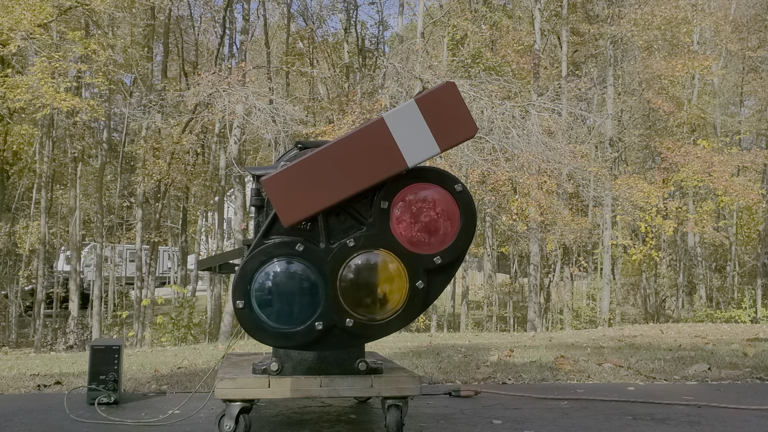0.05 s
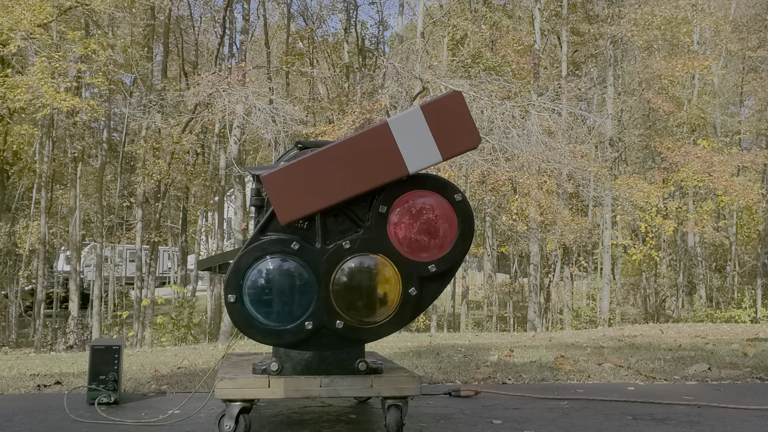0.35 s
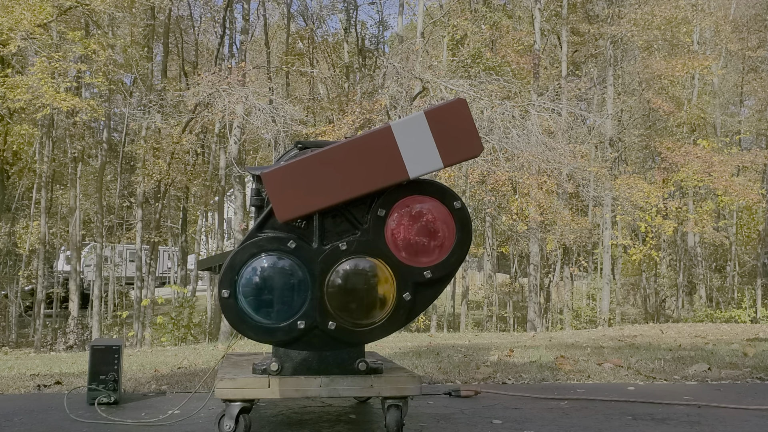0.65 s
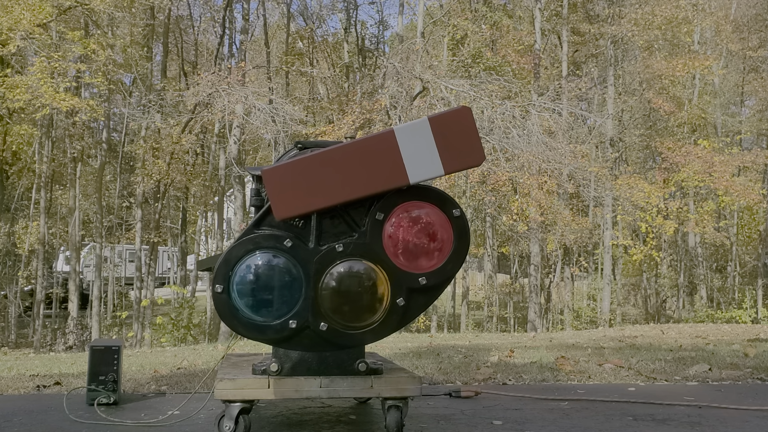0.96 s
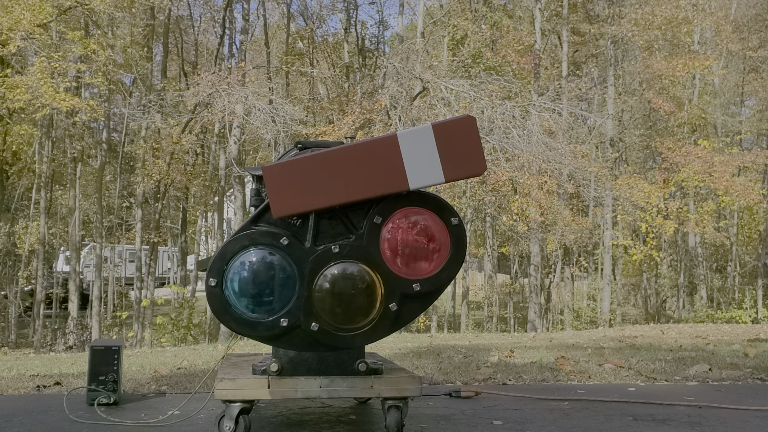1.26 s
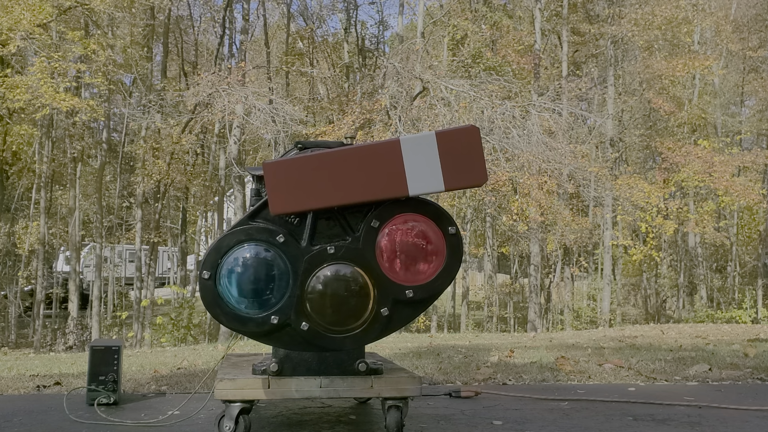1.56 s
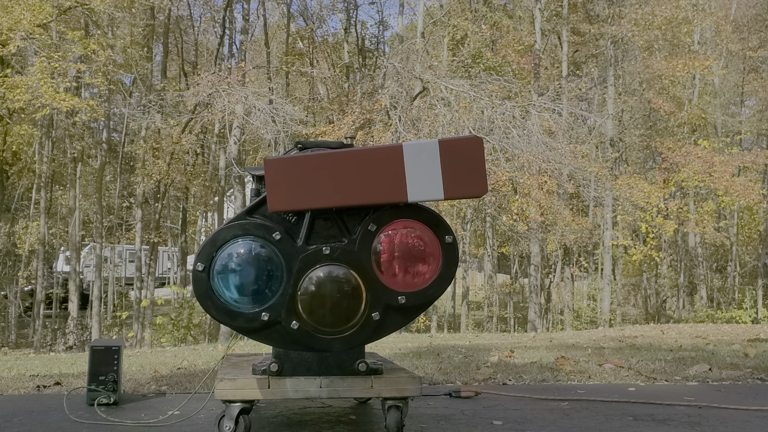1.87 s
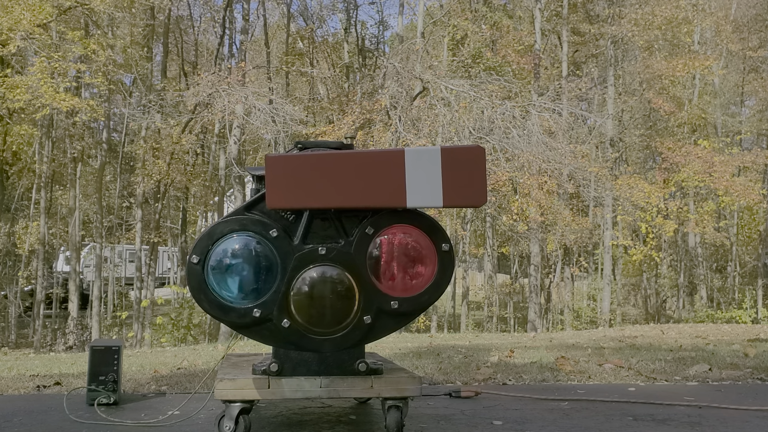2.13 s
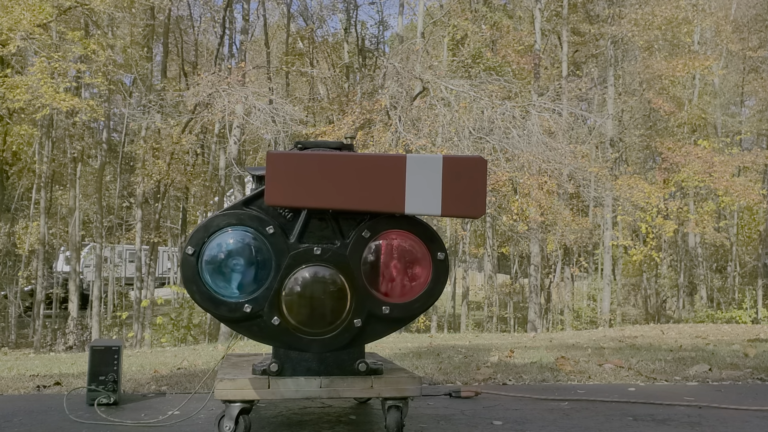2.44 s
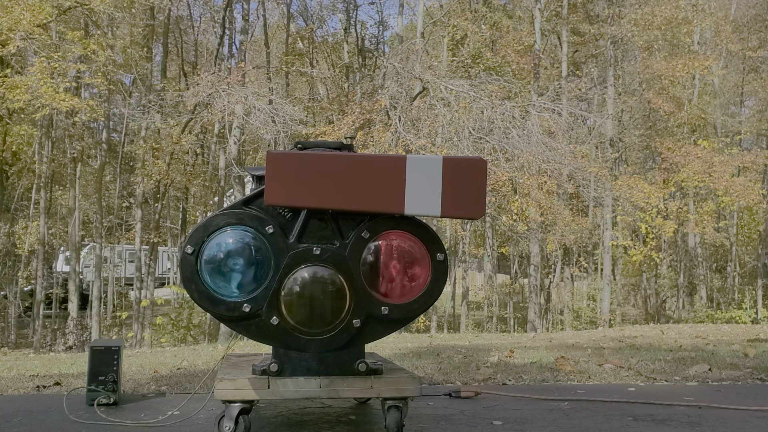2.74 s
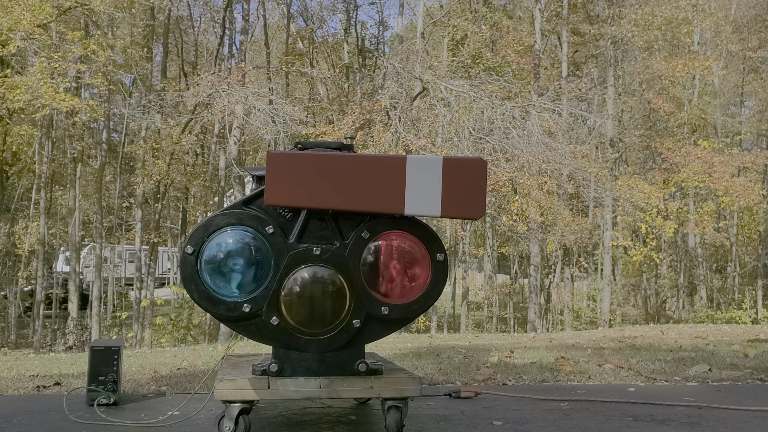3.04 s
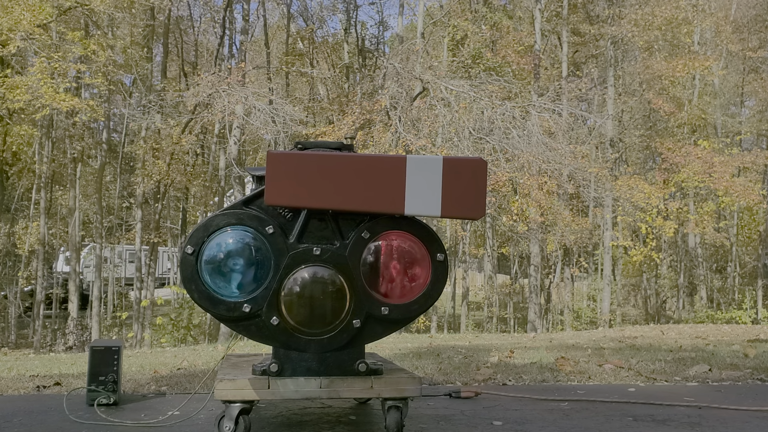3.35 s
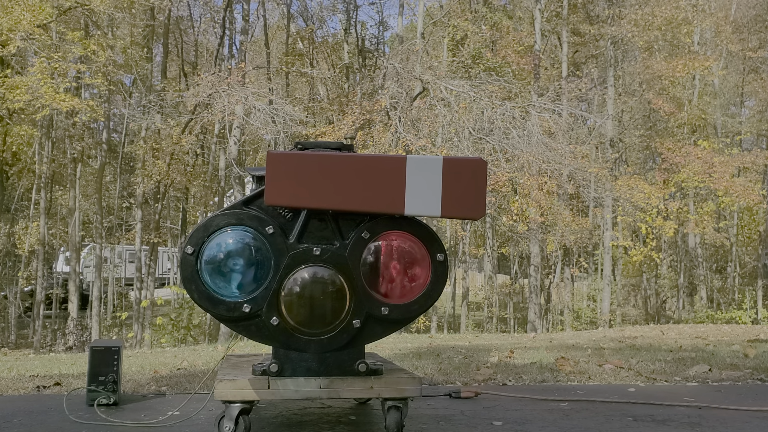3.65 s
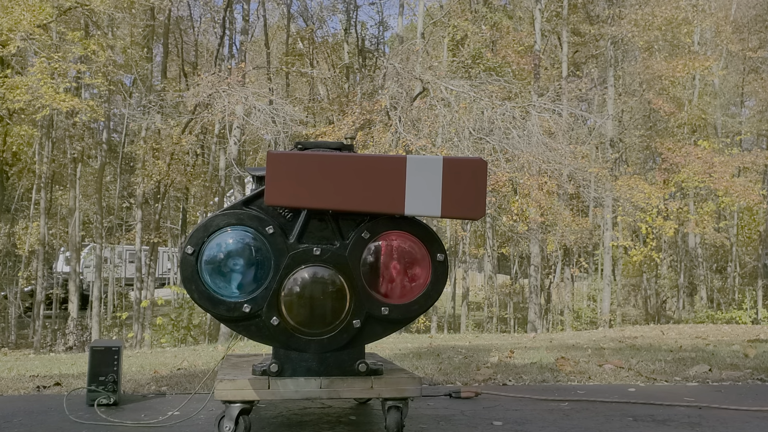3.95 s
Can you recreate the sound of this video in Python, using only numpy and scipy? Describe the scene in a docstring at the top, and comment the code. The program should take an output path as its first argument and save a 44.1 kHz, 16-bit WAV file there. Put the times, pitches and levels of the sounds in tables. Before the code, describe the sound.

A railway signal lowers its arm with rumbling gears, thin steel squeals and sharp clacks, leaving quiet open air and faint birds.

```python
"""Semaphore signal lowering beside a wood

A railway signal lets its arm down: the gear train rumbles in its iron housing, dry steel scrapes and
squeals, sprung contacts snap over one by one, and the arm creeps to rest in small lurches.
A low hum comes and goes. Open air, faint birds, twig snaps and a few soft thuds remain."""
import sys
import numpy as np
from scipy import signal
from scipy.fft import rfft, irfft
from scipy.io import wavfile
from scipy.ndimage import uniform_filter1d

SR = 44100
rng = np.random.default_rng(int(sys.argv[2]) if len(sys.argv) > 2 else 0)


def waveform_to_disk(signal):
    """Save audio, clipped to [-1, 1], as 16-bit WAV at the path in sys.argv[1]."""
    frames = np.transpose(np.atleast_2d(signal))
    scaled = np.clip(frames, -1, 1) * 32767
    samples = np.round(scaled).astype(np.int16)
    wavfile.write(sys.argv[1], SR, samples)


N = 374850

# tone curves of the open air and the microphone hiss: f/Hz, level/dB
AIR_EQ = [(12, -39), (22, -15), (70, 2.5), (190, -9), (388, -12), (1330, -22), (3160, -31), (4300, -32.5),
          (5530, -41), (7950, -31), (8650, -49), (16000, -40)]
HISS_EQ = [(20, -34.5), (5500, -61), (7000, 1.5), (8150, 10), (8500, -30), (16000, -33.5)]
# stereo width of the air and the mechanism: f/Hz, left-right likeness
AIR_LIKENESS = [(60, 0.88), (130, 1), (290, 0.18), (640, -0.44), (1400, -0.74), (3100, -0.11),
                (15000, -0.046)]
SIGNAL_LIKENESS = [(290, 1), (640, 0.67), (1400, 0.49), (4000, 0.31), (15000, 0.29)]
# their lean to the left: f/Hz, left minus right/dB
AIR_PAN = [(200, -0.5), (400, 2), (1300, 0), (4400, 0.5), (8000, 7), (15000, 2.5)]
SIGNAL_PAN = [(380, -.5), (700, 1.5), (1300, 2.5), (2400, 1.5), (4400, 4.5), (15000, 4)]
# effort of the gear train, easing as the arm comes level: t/s, level/dB
EFFORT = [(0, 2), (0.418, -0.5), (0.749, -4), (1.35, -0.5), (2.25, -1), (2.75, -3), (3.25, -7), (3.9, -9.5),
          (4.1, -14.5), (4.351, -14), (4.88, -23), (5.08, -32.5)]
# lurches of the slowing arm that swell the boom: t/s, gain/dB
LURCHES = [(3.578, 6.5), (3.82, 3.5), (3.97, 7), (4.22, 10), (4.419, 7), (4.87, 5)]
# resonances of the housing, panels, thin covers and wheels: f/Hz, width/Hz, level/dB
HOUSING_MODES = [(172.9, 16.2, 0), (189.4, 13, -6), (208.96, 9.6, -0.5)]
PANEL_MODES = [(268, 10.6, 0), (294.4, 12.8, -0.5), (332.1, 13.1, 0.5), (398.3, 32.4, 0), (422, 28.7, 0),
               (458.7, 29, -6), (510, 23.5, -7.5), (564, 11, -7.5), (623, 21, -8), (645, 10.8, 0.5),
               (661, 72, -11.5), (753.4, 21, -3.5), (790.7, 9.4, -4), (849.3, 30.5, -12), (1018, 83, -22),
               (1275, 44, -20.5), (1400, 54, -21.5)]
COVER_MODES = [(839, 33, 11), (1006, 56, -6), (1180, 26, -5), (1490, 30, -6)]
WHEEL_MODES = [(2300, 34, -10.5), (2548, 70, -1), (2823, 24, -3.5)]
# tone curve of the grinding teeth: f/Hz, level/dB
GRIND_EQ = [(100, -22), (250, 13), (850, -8), (1100, -8.5), (1500, -7), (2000, -19), (3200, -22.5),
            (16000, -60.5)]
# fader moves of the fast gears' whirr: t/s, level/dB
WHIRR_FADER = [(0, -55), (1.0, -59), (1.18, -46), (2.25, -46), (2.47, -58), (2.62, -45), (2.9, -48),
               (4, -75)]
# thin tones of scraping steel: f/Hz, level/dB
SCRAPE_TONES = [(5750, -7), (5985, 0), (6150, -5), (6300, -10)]
# moments where the steel binds: t/s, level/dB
BINDS = [(0.194, -57), (0.334, -69), (0.382, -63), (0.42, -66), (0.62, -66), (1.201, -68), (1.351, -66),
         (1.722, -66), (1.8, -69), (1.934, -60), (2.284, -68.5), (2.433, -59.5), (2.587, -69), (2.744, -72),
         (2.809, -69.5), (2.98, -68), (3.234, -63), (3.309, -65.5), (3.649, -56.5), (4.162, -69),
         (4.619, -70)]
# stretches where the wheels run dry: t/s, length/s, low squeal/dB, high squeal/dB
DRY_RUBS = [(0.042, 0.24, -65.5, -63), (0.274, 0.18, -62, -66.5), (0.491, 0.089, -65, -74),
            (0.76, 0.22, -72, -77), (1.13, 0.11, -61.5, -69), (1.294, 0.11, -59, -65.5),
            (1.432, 0.21, -62, -72), (1.689, 0.079, -66, -68), (1.771, 0.074, -68.5, -66),
            (1.89, 0.084, -63.5, -71), (1.972, 0.055, -64.5, -63), (2.174, 0.077, -63.5, -61.5)]
# low and high squeal: f/Hz, width/Hz, extra length/s
SQUEALS = [(2875, 85, .08), (3945, 80, .015)]
# hiss of dry steel: f/Hz, width/Hz, level/dB
RASP_BANDS = [(3550, 130, 0), (4360, 30, -2), (5740, 1700, -13.5)]
# backlash knocks: t/s, relative boom/dB, relative rattle/dB
KNOCKS = [(0.097, -47, -34.5), (0.374, -20, -33.5), (0.416, -22.5, -35), (1.06, -28.5, -37.5),
          (1.238, -22, -37), (1.361, -21, -32.5), (1.773, -33, -33.5), (1.963, -35, -33.5),
          (2.57, -24.5, -35), (2.994, -24.5, -52), (3.747, -27.5, -50), (4.78, -36, -63)]
# tone curve of loose panels: f/Hz, level/dB
RATTLE_EQ = [(120, -18), (330, 6.5), (850, 0), (1450, -15.5), (1800, -28.5), (8000, -66)]
# contacts snapping and cams knocking: t/s, level/dB, body/dB, treble/dB, frame/dB, spring/dB, t60/s
CLACKS = [(0.499, -44, -2, -37, -19, -33, 0.1), (2.298, -38.5, 12.5, -30, -6.5, -31, 0.065),
          (2.6895, -39, 13.5, -21, -22, -42.5, 0.16), (2.729, -42, 4.5, -19.5, -19, -35, 0.11),
          (3.304, -57.5, 10, -21, -1, -34, 0.15), (3.072, -30, -3.5, 4, -6.5, -2, 0.11),
          (3.45, -32, -2.5, 3.5, -3.5, 0, 0.13), (3.916, -29.5, 3, 3, 0.5, -33, 0.12),
          (4.552, -33, 2.5, -4.5, 1, -28, 0.14)]
# tone curve of a clack: f/Hz, level/dB
CLACK_EQ = [(150, -5), (500, 1.5), (850, 6), (1400, -1), (2400, 0), (4500, -8), (7000, -9), (9000, -16),
            (9800, -25.5), (11000, -17.5), (16000, -21)]
# ring of the contact frame and the leaf spring: f/Hz, level/dB, t60/s
FRAME_MODES = [(791, -19, .45), (834, -14, .2), (1010, -12, .12), (1190, -10, .16), (1270, -20, .33),
               (1297, -19, .36), (1440, -8, .15), (1810, -10, .14), (1950, -6, .14), (3120, -11, .17),
               (3320, -14, .16), (4900, -13, .11)]
SPRING_MODES = [(5440, -17, .3), (5420, -8, .1), (5490, -12, .07), (8520, -17, .08)]
# swells of the hum: t/s, length/s, rise/s, level/dB
HUMS = [(0.892, 3.17, 2.1, -48.5), (5.454, 1.34, 0.57, -54.5)]
# bird trills: t/s, length/s, top of the arch f/Hz, relative level/dB
TRILLS = [(2.786, 0.33, 3950, -70), (6.564, 0.312, 3920, -69.5)]
# far bird whistles: t/s, length/s, f/Hz, level/dB, rasp/0-1
WHISTLES = [(5.201, 0.05, 4530, -69, 0.05), (5.457, 0.12, 3200, -77.5, 0.5), (6.19, 0.25, 4090, -80, 0.1),
            (6.224, 0.1, 3200, -77, 0.7), (7.144, 0.11, 3230, -77.5, 0.6), (7.677, 0.12, 3280, -76.5, 0.7)]
# twigs and dry leaves: t/s, level/dB, centre f/Hz
TWIGS = [(5.861, -60, 2960), (6.211, -54, 2620), (6.648, -55, 1400), (6.754, -53, 1990), (6.816, -55, 5900),
         (6.908, -53.5, 2700), (7.33, -48, 900), (8.07, -48.5, 4030), (8.088, -44, 3550)]
# soft thuds on the ground: t/s, level/dB, f/Hz
THUDS = [(6.645, -50, 435), (7.331, -41, 496), (7.332, -40.5, 186), (7.417, -48.5, 603),
         (7.945, -43.5, 397)]

TIME = np.arange(N) / SR


def gain_of(db):
    """Decibels to amplitude."""
    return 10 ** (np.asarray(db) / 20)


def unit_rms(x):
    """Scales to rms 1."""
    return x / np.sqrt(np.mean(x ** 2) + 1e-20)


def curve_at(points, hz):
    """Reads a curve on a log-frequency axis."""
    f, value = np.transpose(points)
    return np.interp(np.log(hz + 1), np.log(f + 1), value)


def add(mix, s, sound):
    """Mixes a sound in at time s."""
    part = mix[..., max(round(s * SR), 0):][..., :sound.shape[-1]]
    part += sound[..., :part.shape[-1]]


def bins(x):
    """Frequencies of the spectrum of x."""
    return np.fft.rfftfreq(x.shape[-1], 1 / SR)


def noise(size=N):
    """Two unrelated channels of white noise."""
    return rng.standard_normal((2, size))


def filtered(x, response):
    """Weights each frequency of x."""
    return irfft(rfft(x) * response, x.shape[-1])


def coloured(x, eq):
    """Shapes x with a tone curve (f/Hz, level/dB), at rms 1."""
    return unit_rms(filtered(x, gain_of(curve_at(eq, bins(x)))))


def resonant(x, modes):
    """Plays x through resonances (f/Hz, width/Hz, level/dB) of alternating polarity, at rms 1."""
    f, response = bins(x), 0
    for k, (hz, width, db) in enumerate(modes):
        detune = (f - hz) / width
        response += (-1) ** k * gain_of(db) / ((1 + 2j * detune) * (1 + 0.5j * detune))
    return unit_rms(filtered(x, response))


def wander(hz, size=N):
    """Smooth random modulation up to about hz, at rms 1."""
    coarse = rng.standard_normal(size // 16 + 1)
    slow = filtered(coarse, 1 / (1 + (bins(coarse) / 16 / hz) ** 4))
    return unit_rms(np.interp(np.linspace(0, len(slow) - 1, size), np.arange(len(slow)), slow))


def held(start, length, attack, release):
    """Envelope that rises, holds and is gone after its length."""
    t = TIME - start
    return np.clip(np.minimum(t / attack, (length - t) / release), 0, 1)


def swell(s, half_width_s):
    """A bell-shaped swell around time s."""
    return np.exp(-((TIME - s) / half_width_s) ** 2)


def ring(modes, t):
    """Dying modes, with their own phases in each channel."""
    return sum(gain_of(db - 60 * t / t60) * np.sin(2 * np.pi * (hz * t + rng.random((2, 1))))
               for hz, db, t60 in modes)


def stereo(pair, likeness, pan, left_lead_s=0):
    """Blends two versions of a sound into a stereo image; the first feeds both sides."""
    left, other = rfft(pair)
    f = bins(pair)
    shared = np.clip(curve_at(likeness, f), -1, 1)
    lean = gain_of(curve_at(pan, f) / 2)
    right = (shared * left + np.sqrt(1 - shared ** 2) * other) * np.exp(-2j * np.pi * f * left_lead_s)
    return irfft(np.array([left * lean, right / lean]), N)


def air():
    """The bed: breeze and microphone hiss, with distant rumble and leaves that each swell once."""
    breeze = coloured(noise(), AIR_EQ) * gain_of(-57 + 0.17 * wander(5))
    rumble = resonant(noise(), [(63.5, 33, 12), (97, 25, -1.5)])
    rumble *= gain_of(-68 + 15.3 * swell(7.38, 0.07))
    stirring = noise() * gain_of(7.1 * np.tanh(wander(30)))
    leaves = coloured(stirring, [(300, -26), (2200, 2), (5000, 7.5), (15000, -20)])
    leaves *= gain_of(-84 + 8.5 * swell(7.6, 0.58))
    hiss = gain_of(-83) * coloured(noise(), HISS_EQ)
    return stereo(breeze + rumble + leaves + hiss, AIR_LIKENESS, AIR_PAN)


def effort_db():
    """Effort of the gear train at every sample."""
    return np.interp(TIME, *np.transpose(EFFORT))


def teeth(per_s, slide, uneven_db):
    """Small tooth impacts over sliding friction, in uneven surges."""
    impacts = noise() * (rng.random(N) < per_s / SR)
    return (unit_rms(impacts) + slide * noise()) * gain_of(uneven_db * wander(8.5))


def gears():
    """Meshing teeth make the housing boom and its panels grind; the arm's weight steadies the load."""
    drive = teeth(per_s=700, slide=1.2, uneven_db=1.5)
    boom = resonant(drive, HOUSING_MODES)
    boom = unit_rms(boom / np.sqrt(uniform_filter1d(boom ** 2, 4000) + 0.19))  # gentle compression
    panels = resonant(drive, PANEL_MODES) + gain_of(-13.5) * coloured(drive, GRIND_EQ)
    panels /= np.sqrt(uniform_filter1d(unit_rms(panels) ** 2, 3000) * 0.33 + 0.49)
    dull = coloured(panels, [(350, 0), (415, 6.5), (500, 1), (1500, -0.5)])  # slow teeth land softly
    slowing = np.interp(TIME, [3, 4.1], [0, 1])
    grind = (1 - slowing) * panels + slowing * dull
    lurch_db = sum(db * swell(s, 0.04) for s, db in LURCHES)
    boom_db, grind_db = -35 + 0.68 * effort_db() + lurch_db, -37 + effort_db()
    running = np.interp(TIME, [4.98, 5.12], [1, 0])
    return running * (gain_of(boom_db) * boom + gain_of(grind_db) * grind)


def whirr():
    """The fast gears rattle in their thin covers, swelling and falling away."""
    level_db = np.interp(TIME, *np.transpose(WHIRR_FADER), right=-np.inf)
    rattling = teeth(per_s=150, slide=0.45, uneven_db=2.5)
    rattling /= np.sqrt(uniform_filter1d(rattling ** 2, 5000))  # levels out the surges
    return gain_of(level_db) * resonant(rattling, COVER_MODES)


def wheels():
    """Dry rubbing murmurs in the wheels; now one mode takes hold and now another."""
    rubbing = teeth(per_s=400, slide=1, uneven_db=1.2)
    holds = [gain_of(2 * wander(7)) for _ in WHEEL_MODES]
    song = sum(hold * gain_of(db) * resonant(rubbing, [(hz, width, 0)])
               for hold, (hz, width, db) in zip(holds, WHEEL_MODES))
    return gain_of(-63.5 + 1.96 * effort_db()) * unit_rms(song)


def scrapes(until_s=3.8, edge_s=0.013):
    """Steel on steel: thin, wavering tones over grit, flaring briefly wherever it binds."""
    level = gain_of(-77) * held(0, until_s, edge_s, edge_s)
    level += sum(gain_of(db) * swell(s, edge_s) for s, db in BINDS)
    tones = np.zeros(N)
    for centre_hz, db in SCRAPE_TONES:
        flicker = gain_of(db + 4 * wander(25))
        hz = centre_hz + 60 * wander(30) + 130 * wander(600)
        tones += flicker * np.sin(2 * np.pi * np.cumsum(hz) / SR)
    wide_tones = unit_rms(np.array([tones, tones[::-1]]))
    grit = resonant(teeth(per_s=600, slide=1, uneven_db=3), [(5400, 900, 0)])
    return level * unit_rms(wide_tones + 0.5 * grit)


def squeals(drift=0.01):
    """Each dry stretch of the wheels sings two squeals, at slightly new pitches, over a rasp."""
    out = np.zeros((2, N))
    for start, length, low_db, high_db in DRY_RUBS:
        for db, (hz, width, extra_s) in zip((low_db, high_db), SQUEALS):
            size = round((length + extra_s) * SR)
            stroke = signal.windows.tukey(size, 0.7) * gain_of(2.5 * wander(60, size))  # stick and slip
            own_hz = hz * (1 + drift * rng.uniform(-0.94, 1))
            squeal = resonant(noise(size), [(own_hz, width, 0)])
            add(out, start - extra_s / 2, gain_of(db) * stroke * squeal)
        rasp = resonant(noise(size), RASP_BANDS)
        add(out, start, gain_of(high_db - 4) * stroke * rasp)  # shares the high squeal's envelope
    return out


def knocks():
    """Slack in the gears is taken up with a dull knock of the housing and a rattle of its panels."""
    out, t = np.zeros((2, N)), np.arange(SR // 4) / SR
    boom = sum(gain_of(db) * np.exp(-np.pi * width * t) * np.sin(2 * np.pi * hz * t)
               for hz, width, db in HOUSING_MODES)
    boom *= 1 - np.exp(-t / 0.0071)
    jolt = np.exp(-t / 0.009) * (1 - np.exp(-t / 0.0007))
    for s, boom_db, rattle_db in KNOCKS:
        add(out[0], s, gain_of(boom_db - 3) * boom)
        add(out, s, gain_of(rattle_db + 2.5) * jolt * coloured(noise(len(t)), RATTLE_EQ))
    return out


def contacts(touch_lead_s=0.003, pad_s=0.01):
    """A contact brushes its stop, then cracks and clatters, ringing its frame and quivering spring."""
    out, t = np.zeros((2, N)), np.arange(SR // 2) / SR
    grid_hz, pad = np.arange(0, SR / 2, 90), round(pad_s * SR)
    crack = 1.9 * np.exp(-t / 0.004) * (1 - np.exp(-t / 0.002))
    for s, db, body_db, treble_db, frame_db, spring_db, t60 in CLACKS:
        ripple = np.interp(bins(t), grid_hz, 1.5 * rng.standard_normal(len(grid_hz)))
        own_colour = gain_of(4 * np.tanh(ripple))
        metal = coloured(filtered(noise(len(t)), own_colour), CLACK_EQ)
        clatter = gain_of(0.61 * wander(320, len(t)) - 60 * t / t60) * (1 - np.exp(-t / 0.0062))
        iron_tail = gain_of(-28.5 - 60 * t / 0.55) * coloured(metal, [(5000, 3), (9000, -18.5)])
        frame = gain_of(frame_db) * ring(FRAME_MODES, t) * (1 - np.exp(-t / 0.00047))
        clack = np.pad(metal * (crack + clatter) + iron_tail + frame, ((0, 0), (pad, pad)))
        touch = gain_of(-15) * crack * metal[:, ::-1]
        add(clack, pad_s - touch_lead_s, touch)
        # each blow has its own tone: the loudest snaps are bright, the softer knocks dull
        tilt_db = curve_at([(1100, body_db), (2600, 0), (7000, treble_db)], bins(clack))
        add(out, s - pad_s, gain_of(db) * filtered(clack, gain_of(tilt_db)))
        quiver_db = 2 * wander(90, len(t))
        add(out, s, gain_of(db + spring_db + quiver_db) * ring(SPRING_MODES, t))
    return out


def hum(hz=73.3, release_s=0.43):
    """A low, nearly pure hum that builds slowly, wavers a little and dies quickly."""
    cycles = np.cumsum(hz * (1 + 0.0066 * wander(5.7))) / SR
    level = sum(gain_of(db) * held(start, length, rise, release_s) ** 1.02
                for start, length, rise, db in HUMS)
    return level * unit_rms(np.sin(2 * np.pi * cycles))


def wood_echo(call, t60):
    """Trunks scatter a call into a short, diffuse tail."""
    t = np.arange(SR // 8) / SR
    paths = noise(len(t)) * gain_of(-60 * t / t60)
    return signal.fftconvolve(call[None], paths, axes=1)


def trills(notes_per_s=34.5, sag_hz=140, bend_hz=170):
    """A small bird's quick run: each raspy note bends up and back, all on one gentle arch of pitch."""
    out = np.zeros((2, N))
    for s, length, top_hz, db in TRILLS:
        t = np.arange(round(length * SR)) / SR
        arch = np.sin(0.8 * np.pi * t / length)
        notes = np.sin(np.pi * notes_per_s * t) ** 2
        rasp_hz = 55 * wander(260, len(t))
        hz = top_hz - sag_hz * (1 - arch) + bend_hz / 2 * (notes - notes.mean()) + rasp_hz
        envelope = notes * (1 + arch) * signal.windows.tukey(len(t), 0.1)
        song = envelope * np.sin(2 * np.pi * np.cumsum(hz) / SR)
        add(out, s, gain_of(db - 3) * unit_rms(song))
        add(out, s, gain_of(db - 5) * unit_rms(wood_echo(song, t60=0.46)))
    return out


def whistles():
    """Far bird whistles flutter and echo in the wood; the raspy ones smear into a band."""
    out = np.zeros((2, N))
    for s, length, pitch_hz, db, rasp in WHISTLES:
        size = round(length * SR)
        hz = pitch_hz + 260 * rasp * wander(132, size)
        whistle = np.sin(2 * np.pi * np.cumsum(hz) / SR) * signal.windows.tukey(size, 0.4)
        distant = wood_echo(whistle, t60=0.22)
        add(out, s, gain_of(db) * distant / distant[:, :size].std())
    return out


def twigs():
    """Dry, broadband snaps a little to the left, each trailing a short rustle."""
    out, t = np.zeros((2, N)), np.arange(SR // 5) / SR
    envelope = np.exp(-t / 0.0015) + gain_of(-9) * np.exp(-t / 0.023)
    for s, db, hz in TWIGS:
        eq = [(hz / 5, -16), (hz * 0.38, -2), (hz, 0), (hz * 3, -16), (hz * 6, -30)]
        add(out, s, gain_of(db) * envelope * coloured(noise(len(t)), eq))
    return out * gain_of([[1.5], [-1.5]])


def thuds():
    """Soft pushes on the ground, a cycle or two with no ring."""
    out, t = np.zeros(N), np.arange(SR // 10) / SR
    for s, db, hz in THUDS:
        cycles = hz * t
        push = 2 * cycles * np.exp(1 - 2 * cycles)
        add(out, s, gain_of(db) * push * np.sin(2 * np.pi * cycles))
    return out


def scene():
    """The signal stands a little to the left, with the wood all round."""
    mechanism = gears() + whirr() + wheels() + squeals() + knocks() + contacts() + scrapes()
    placed = stereo(mechanism, SIGNAL_LIKENESS, SIGNAL_PAN, left_lead_s=0.000096)
    return placed + hum() + air() + whistles() + trills() + twigs() + thuds()


def record(dry, cutoff_hz=15900):
    """A steep low-pass trims the very top."""
    low_pass = signal.firwin(511, cutoff_hz, window=("kaiser", 9), fs=SR)
    return signal.oaconvolve(dry, low_pass[None], "same")


dry = scene()
out = record(dry)
waveform_to_disk(out)
```